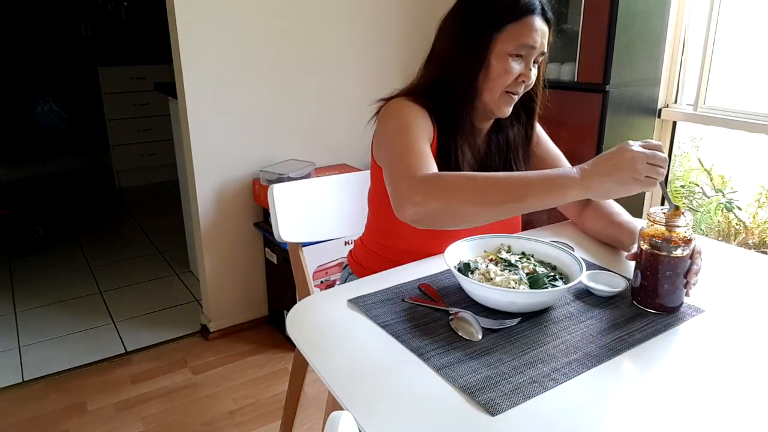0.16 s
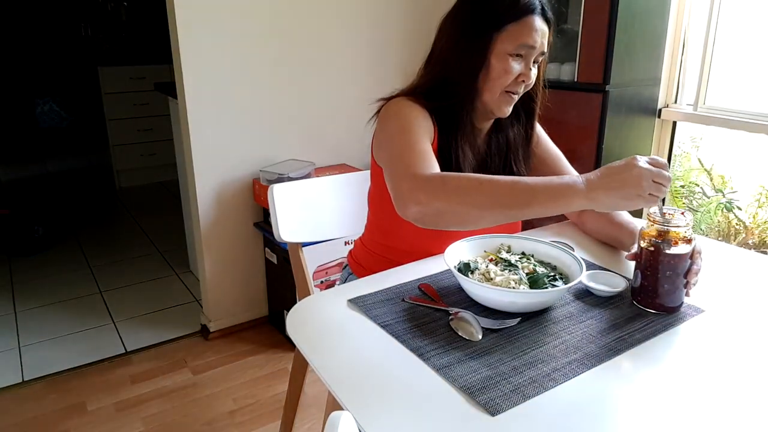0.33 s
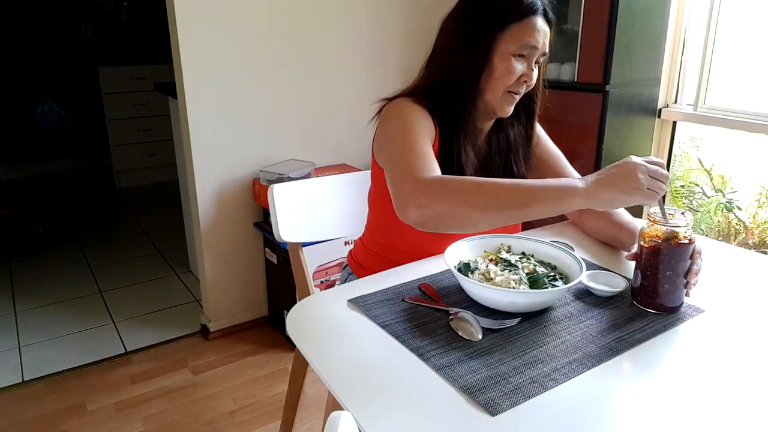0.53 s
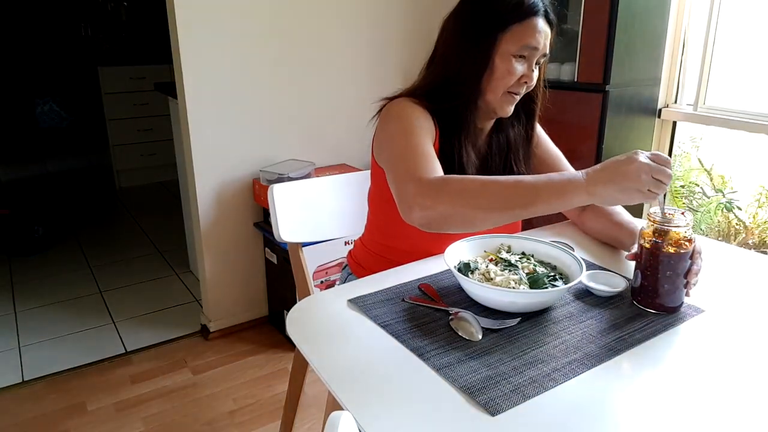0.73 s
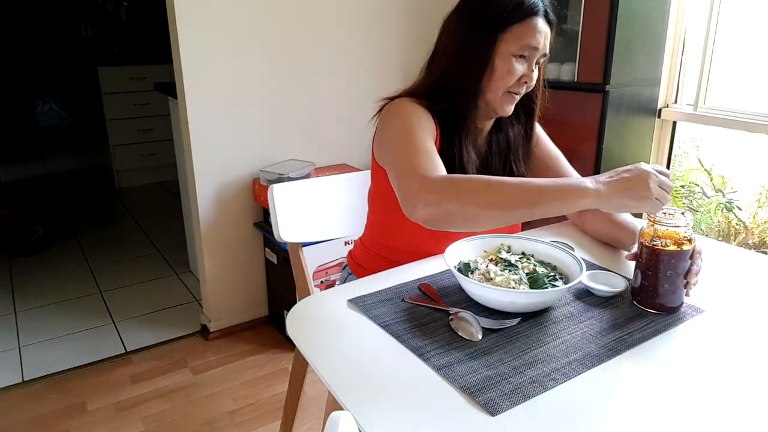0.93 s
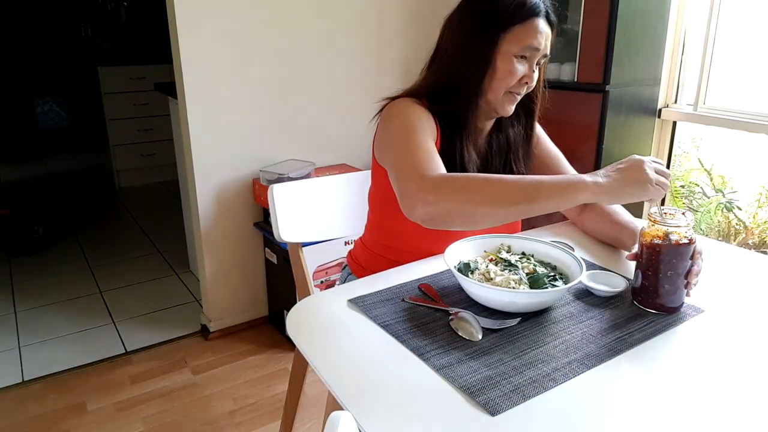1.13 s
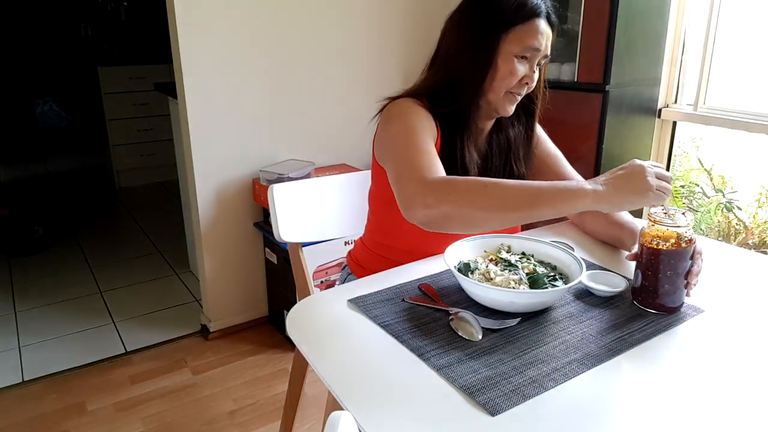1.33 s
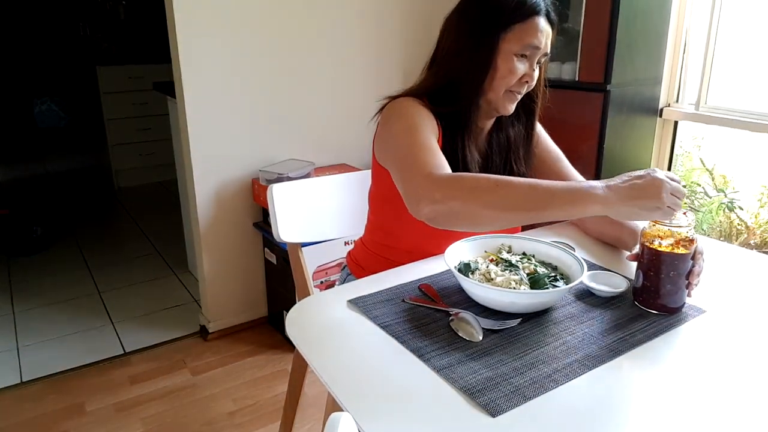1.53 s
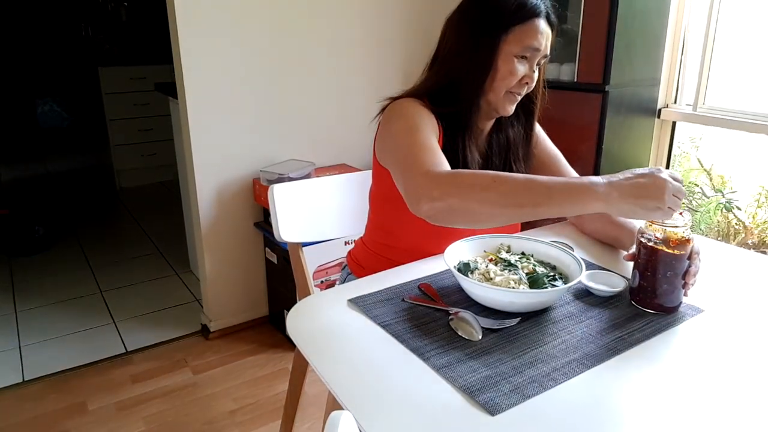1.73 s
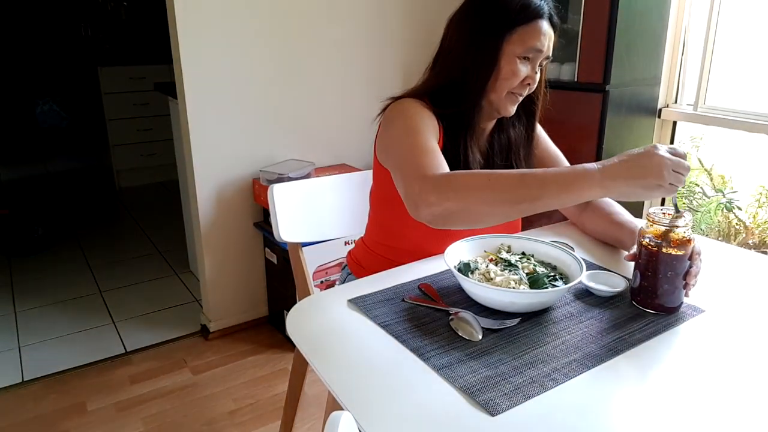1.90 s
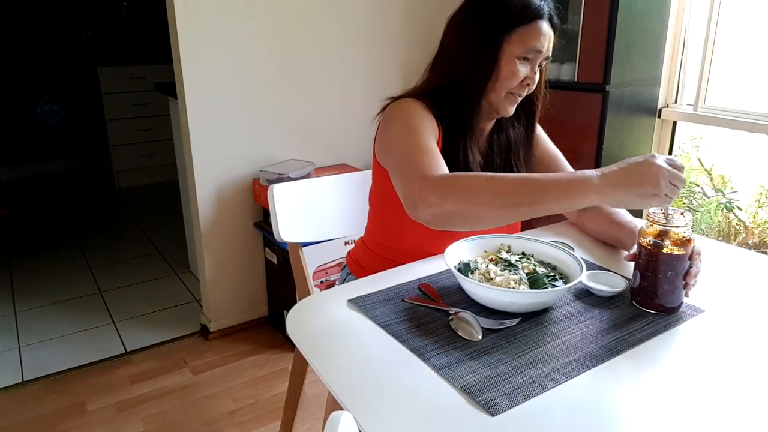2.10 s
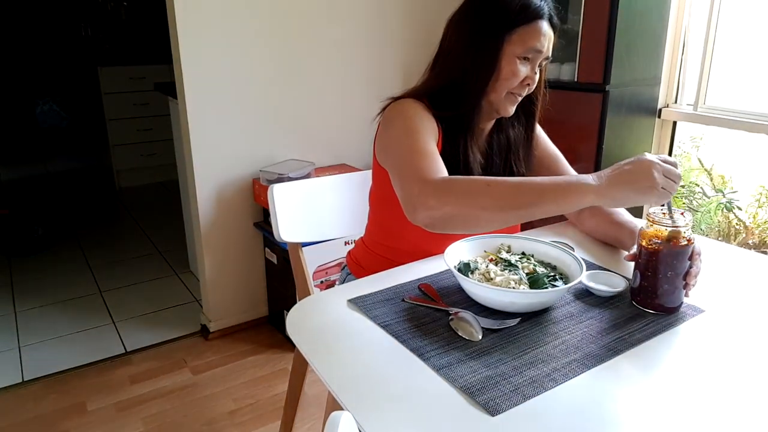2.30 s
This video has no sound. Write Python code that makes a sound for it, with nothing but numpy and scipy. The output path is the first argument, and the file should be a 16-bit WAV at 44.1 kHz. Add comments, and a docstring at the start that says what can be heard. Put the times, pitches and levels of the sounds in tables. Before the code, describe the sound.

A metal spoon clinks against a full glass jar indoors as a car passes outside

```python
"""Appliances hum under room tone throughout, and a few faint high ticks come and go from the start: decaying sines.
A steel spoon knocks the inside of a thick glass jar full of sauce, across a table in a bare, live dining room:
damped modes and a crack. Sauce and holding hand damp the glass at once, so the room carries the ring.
After three blows a car, made of shaped noise, swells and fades outside; a last blow falls near two seconds.
Two microphone ports pick it up, the left one brighter."""
import sys
import numpy as np
from scipy import signal
from scipy.fft import rfft, irfft, next_fast_len
from scipy.io import wavfile
from scipy.ndimage import map_coordinates

SR = 44100
rng = np.random.default_rng(int(sys.argv[2]) if len(sys.argv) > 2 else 0)


def unload_audio(sound):
    """Save the sound as a 16-bit wav file, at the path given as the first command line argument."""
    columns = np.transpose(np.atleast_2d(sound))
    # keep every value between -1 and 1, then stretch to whole-number steps
    steps = np.round(np.clip(columns, -1, 1) * 32767)
    wavfile.write(sys.argv[1], SR, steps.astype(np.int16))


N = 103635  # length in samples


def amp(db):
    """Decibels to amplitude ratio: 20 dB for each factor of ten."""
    return 10 ** (np.asarray(db) / 20)


def unit(x):
    """Normalisation to a root-mean-square value of 1."""
    return x / np.sqrt(np.mean(x ** 2) + 1e-20)


def along(points, hz):
    """Linear interpolation of (Hz, value) points on a logarithmic frequency axis."""
    point_hz, values = np.transpose(points)
    return np.interp(np.log(hz + 1), np.log(point_hz + 1), values)


def levels(rows):
    """Linear interpolation in time: one dB value per sample for each column after the time."""
    seconds, *columns = np.transpose(rows)
    return [np.interp(np.arange(N) / SR, seconds, column) for column in columns]


def wobble(rate):
    """Slow random modulation: a spline through normal random knots, rate knots a second."""
    knots = rng.standard_normal(int(N * rate / SR) + 4)
    return map_coordinates(knots, [np.arange(N) * rate / SR])


def filtered(x, response):
    """Linear filtering: the spectrum of x times a complex response of frequency."""
    size = next_fast_len(x.shape[-1] + SR // 4)
    spectrum = rfft(x, size) * response(np.fft.rfftfreq(size, 1 / SR))
    return irfft(spectrum, size)[..., :x.shape[-1]]


def rush(gain, alike):
    """Partly coherent stereo noise of rms 1: the mid-to-side ratio sets the left-right correlation."""
    def mid_side_gains(hz):
        angle = np.arccos(np.clip(along(alike, hz), -1, 1)) / 2
        return gain(hz) * np.array([np.cos(angle), np.sin(angle)])

    mid, side = filtered(rng.standard_normal((2, N)), mid_side_gains)
    return unit(np.array([mid + side, mid - side]))


def resonance(centre_hz, width_hz):
    """Resonance curve: the gain falls to half at width_hz either side of the centre."""
    return lambda hz: 1 / (1 + ((hz - centre_hz) / width_hz) ** 2)


def ring(modes, t):
    """Modal synthesis: exponentially damped sines, each level scattered afresh on every call."""
    scatter_db = 0.48
    total = 0
    for hz, db, t60 in modes:
        level_db = db + scatter_db * rng.standard_normal() - 60 * t / t60
        total = total + amp(level_db) * np.sin(2 * np.pi * hz * t)
    return total


def click(points, size):
    """Minimum-phase impulse: folding the cepstrum makes (Hz, dB) points into a causal sound."""
    log_gain = np.log(amp(along(points, np.fft.rfftfreq(size, 1 / SR))))
    cepstrum = irfft(log_gain, size)
    fold = np.r_[1, np.full(size // 2 - 1, 2), 1, np.zeros(size // 2 - 1)]
    return irfft(np.exp(rfft(cepstrum * fold)), size)


def room(x):
    """Diffuse reverberation: noise that rises after a short gap and decays at a rate set by frequency."""
    # Decay of the room. Each row: frequency in Hz, time to fall by 60 dB in seconds.
    room_decay = [(300, .45), (1000, 0.65), (2500, 0.4), (4500, 0.4), (8000, .38), (12000, 0.26),
                  (16000, 0.27)]
    gain_db, gap_s, rise_s = 6, 0.002, 0.0044
    left_right_likeness = -.05
    hz, t, z = signal.stft(rng.standard_normal((2, SR // 2)), SR, nperseg=256)
    decay = amp(-60 * t / along(room_decay, hz)[:, None])
    tail = signal.istft(z * decay, SR, nperseg=256)[1]
    since_gap = np.maximum(np.arange(tail.shape[1]) / SR - gap_s, 0)
    tail = tail * (1 - np.exp(-since_gap / rise_s))
    angle = np.arccos(left_right_likeness) / 2
    tail = np.cos(angle) * tail[0] + np.sin(angle) * tail[1] * [[1], [-1]]
    tail = tail / np.linalg.norm(tail[0])  # unit energy on the left
    return amp(gain_db) * signal.fftconvolve(x[None], tail, axes=1)[:, :len(x)]


def room_tone():
    """Broadband noise: room tone and microphone hiss, wavering slowly in level."""
    # Colour of the noise. Each row: frequency in Hz, relative level in dB per Hz.
    air_colour = [(12, -44), (20, -1.5), (53, -0.5), (155, -12), (199, -6), (391, -19.5), (705, -17.5),
                  (933, -22.5), (1380, -21.5), (2290, -27), (3030, -26.5), (7030, -34), (8310, -29),
                  (15000, -27), (16300, -52)]
    # Coherence of the noise. Each row: frequency in Hz, left-right likeness from -1 to 1.
    air_alike = [(30, 1), (120, 0.6), (300, .7), (700, .2), (1650, -0.41), (5000, 0.21), (15000, -0.35)]
    level_db = -67.5 + 0.772 * wobble(4.4)
    return amp(level_db) * rush(lambda hz: amp(along(air_colour, hz)), air_alike)


def appliances():
    """Tonal and narrow-band sound: a tone wavering in level and phase, over resonance-shaped noise hums."""
    # Hums. Each row: centre in Hz, level in dB rms, half-width at half gain in Hz.
    hum_bands = [(60.5, -68.5, 14), (302.6, -85, 8.9)]
    motor_hz, motor_peak_db = 200.7, -72
    motor_level = amp(motor_peak_db + 1.5 * wobble(6.7))
    phase = 2 * np.pi * motor_hz * np.arange(N) / SR + .6 * wobble(9.6)
    total = motor_level * np.sin(phase)
    for hz, db, width_hz in hum_bands:
        total = total + amp(db) * rush(resonance(hz, width_hz), [(100, 0.76)])
    return total


def ticks():
    """Damped oscillation: faint high ticks, heard mostly through the reverberant field."""
    # Ticks. Each row: start in seconds, frequency in Hz, 60 dB decay time in seconds,
    # level in dB ahead of the direct and room gains.
    tick_rows = [(.11, 8070, .02, -66), (.442, 9860, .006, -50), (.56, 10500, 0.01, -62),
                 (1.338, 8400, 0.0045, -53), (1.87, 7500, 0.0052, -56)]
    out, t = np.zeros(N + SR), np.arange(SR // 10) / SR
    for start_s, hz, t60, db in tick_rows:
        start = round(start_s * SR)
        out[start:start + len(t)] += ring([(hz, db, t60)], t)
    return 0.43 * out[:N] + .5 * room(out[:N])


def car():
    """Band-shaped noise: two bands of tyre roar, the lower one cresting later, over a low engine rumble."""
    # Passing of the car. Each row: time in seconds, mean level of the upper roar in dB, of the lower roar in dB.
    roar_levels = [(0.0, -84, -86), (0.33, -80, -81.5), (0.54, -91, -80.5), (0.72, -87.5, -82),
                   (0.86, -82.5, -78), (1.03, -65.5, -76.5), (1.18, -68, -68), (1.39, -69, -67),
                   (1.75, -76.5, -75.5), (2.35, -80, -86)]
    # Colours of the upper, then the lower roar. Each row: frequency in Hz, relative level in dB per Hz.
    roar_colours = [
        [(410, -33), (700, -7.5), (914, -3), (1190, -8), (1480, -22.5), (2500, -33), (3250, -59.5),
         (5500, -120)],
        [(160, -29.5), (280, 0), (302, -2), (377, -11), (581, -5.5), (800, -5.5), (1040, -29.5), (1760, -120)],
    ]
    # Coherence of the roar. Each row: frequency in Hz, left-right likeness from -1 to 1.
    roar_alike = [(300, .6), (1500, 0.202)]
    # Far engine rumble. Each row: time in seconds, level in dB ahead of a fixed 2.5 dB cut.
    rumble_levels = [(0.0, -72.5), (0.18, -71), (0.2, -74.5), (0.63, -66), (0.65, -69), (1.62, -74),
                     (1.64, -59), (1.9, -80), (2.13, -66.5), (2.35, -83)]
    total = 0
    for db, colour in zip(levels(roar_levels), roar_colours):
        noise = rush(lambda hz: amp(along(colour, hz)), roar_alike)
        total = total + amp(db + 1.5 * wobble(9)) * noise
    rumble = rush(resonance(118, 16), [(100, 1.0)])  # the same on both sides
    return total + amp(levels(rumble_levels)[0] - 2.5) * rumble


def struck_modes(t, shaft_db, bowl_db, rim_hz):
    """Modal excitation: jar, spoon shaft and spoon bowl build up over the contact, then die away."""
    # Modes of the filled jar. Each row: frequency in Hz, relative level in dB, 60 dB decay time in seconds.
    jar_modes = [(1002, -25, 0.017), (2259, -16, 0.032), (2414, -22.5, .03), (3117, -19.5, 0.034),
                 (3744, -21, .03), (4125, -2.5, 0.026), (4193.6, -7, 0.052), (7030, -18.5, .015),
                 (8100, -20, .012), (10000, -31, 0.028), (10510, -16, 0.019)]
    # Modes of the spoon shaft. Each row: frequency in Hz, relative level in dB, 60 dB decay time in seconds.
    shaft_modes = [(4950, -24, 0.094), (11300, -23.5, .04)]
    # Modes of the spoon bowl. Each row: frequency in Hz, relative level in dB, 60 dB decay time in seconds.
    bowl_modes = [(318, -19.5, 0.11), (2930, 3.5, 0.11), (5820, 4.5, .015), (9670, -2, 0.089),
                  (12400, 11.5, .012)]
    attack_s = 0.00069
    rim_mode = (rim_hz, -23.5, 0.025)  # its pitch depends on where the spoon lands
    modes = ring(jar_modes + [rim_mode], t)
    modes = modes + amp(shaft_db) * ring(shaft_modes, t)
    modes = modes + amp(bowl_db) * ring(bowl_modes, t)
    return modes * (1 - np.exp(-t / attack_s))


def contact_crack(size, crack_db, sharp_db):
    """Impact spectrum: a sharper contact puts more of the crack's energy into the highest frequencies."""
    # Colour of the crack. Each row: frequency in Hz, level in dB per Hz ahead of sharpness and gain.
    crack_colour = [(250, -28), (1500, -25.5), (2100, -0.5), (3200, -2), (4200, 4), (5500, -1.5),
                    (8000, -1.5), (11400, 4.5), (12000, -7), (14500, -11), (16200, -11.5)]
    edge_hz = 11700  # sharpness acts above this
    points = [(hz, level + sharp_db * (hz > edge_hz)) for hz, level in crack_colour]
    return amp(1 + crack_db) * click(points, size)


def direct_path(hz):
    """Delay and interference: the right port lags, and a table-top bounce combs both."""
    right_lag_s, table_s, table_db = .0002, .00192, 0
    port_lag = np.exp(-2j * np.pi * hz * right_lag_s * np.array([[0], [1]]))
    bounce = amp(table_db) * np.exp(-2j * np.pi * hz * table_s)
    return port_lag * (1 + bounce)


def spoon():
    """Superposed paths: each blow's modes and crack arrive direct, off the table and through the room."""
    # Blows of the spoon on the glass. Each row: start in seconds, level in dB, gain of the direct sound in dB,
    # gain of the shaft in dB, of the bowl in dB, of the crack in dB (1 dB is added later),
    # sharpness of the contact in dB, rim mode in Hz, left over right in dB.
    blow_rows = [(0.2348, -17, -1.5, 4, -39.5, 4.5, -20, 14850, 0),
                 (.6800, -18.5, -0.5, 3.5, -27.5, 8.5, -1, 14900, 2.5),
                 (0.7175, -29.5, 1, -1.5, -13.5, 15.5, 7.5, 15150, -3),
                 (1.9754, -22.5, -1.5, -2, -38, 8, 0.5, 14400, 0.5)]
    crack_direct_db = -1.5  # level of the crack in the direct sound
    out, t = np.zeros((2, N + SR)), np.arange(SR * 3 // 5) / SR
    for start_s, db, direct_db, shaft_db, bowl_db, crack_db, sharp_db, rim_hz, pan_db in blow_rows:
        crack = contact_crack(len(t), crack_db, sharp_db)
        modes = struck_modes(t, shaft_db, bowl_db, rim_hz)
        source = modes + amp(crack_direct_db) * crack
        near = amp(direct_db) * filtered(np.array([source, source]), direct_path)
        reverberant = room(modes) + room(crack)
        side_gains = amp([[db + pan_db / 2], [db - pan_db / 2]])
        start = round(start_s * SR)
        out[:, start:start + len(t)] += (near + reverberant) * side_gains
    return out[:, :N]


def scene():
    """Linear superposition of room tone, appliances, ticks, car and spoon."""
    return room_tone() + appliances() + ticks() + car() + spoon()


def record(dry):
    """Port response and band limit: the left port is brighter, and nothing passes above the top frequency."""
    # Tilt between the ports. Each row: frequency in Hz, left over right in dB.
    port_tilt = [(100, -0.5), (500, 5.5), (2000, 3), (4200, 1.5), (8000, 6), (12000, 5), (16000, 2)]
    top_hz = 15780

    def port_response(hz):
        half_each = np.array([[.5], [-.5]])
        return amp(along(port_tilt, hz) * half_each) * (hz < top_hz)

    return filtered(dry, port_response)


dry = scene()
out = record(dry)
unload_audio(out)
```